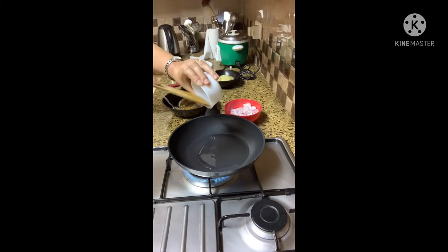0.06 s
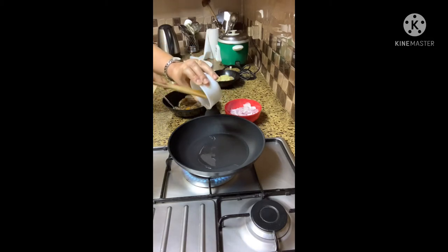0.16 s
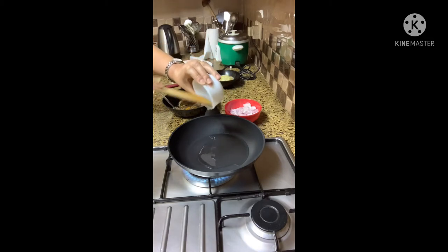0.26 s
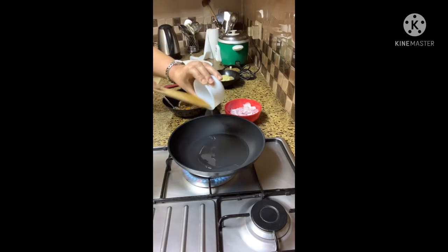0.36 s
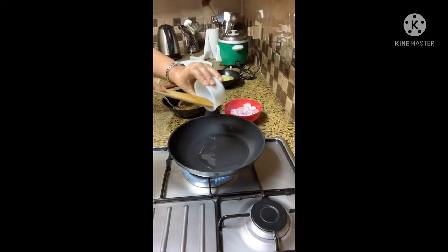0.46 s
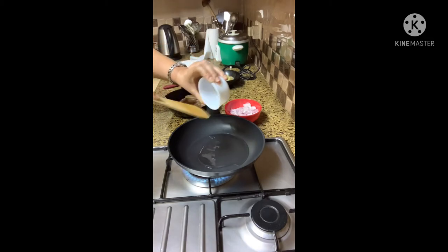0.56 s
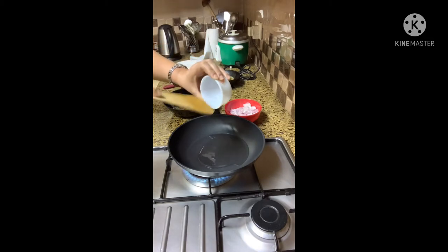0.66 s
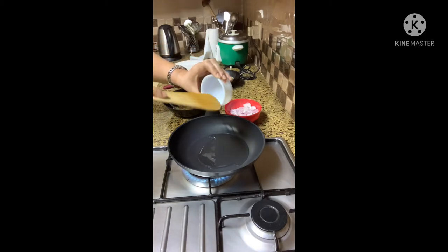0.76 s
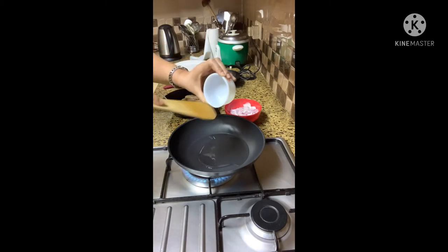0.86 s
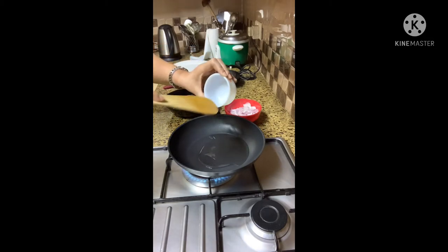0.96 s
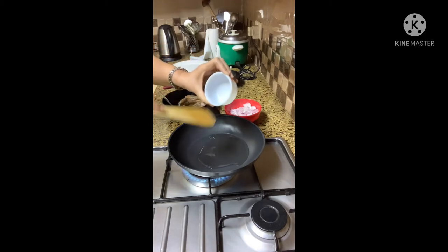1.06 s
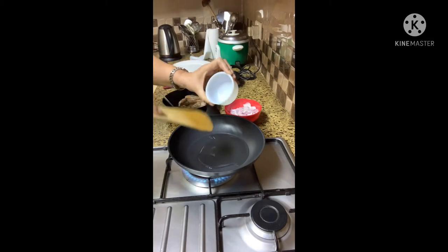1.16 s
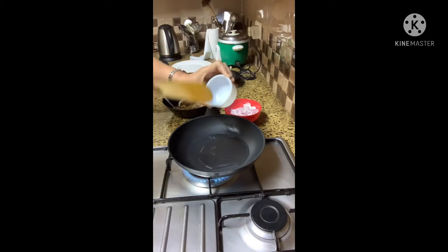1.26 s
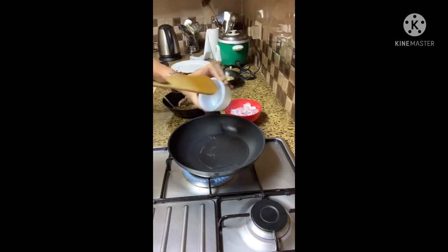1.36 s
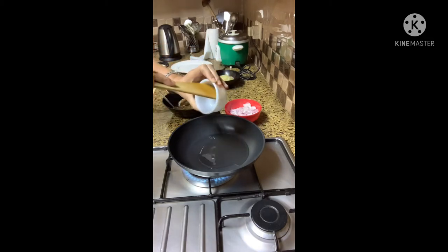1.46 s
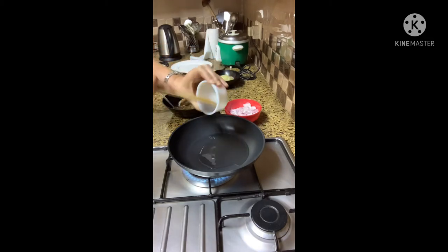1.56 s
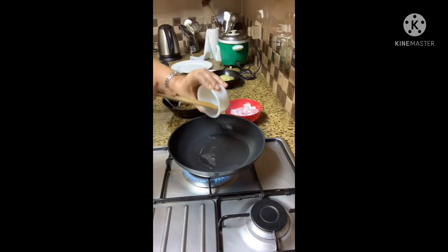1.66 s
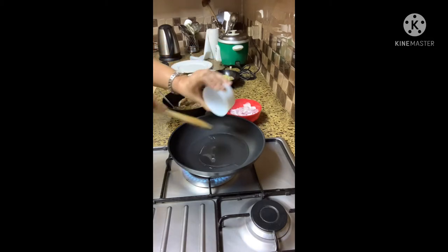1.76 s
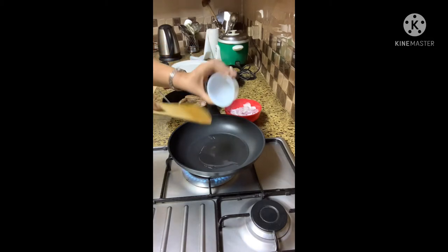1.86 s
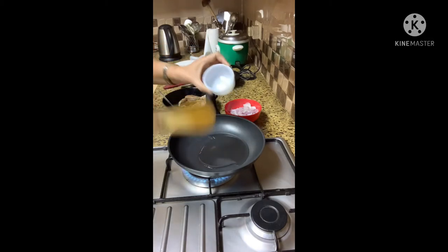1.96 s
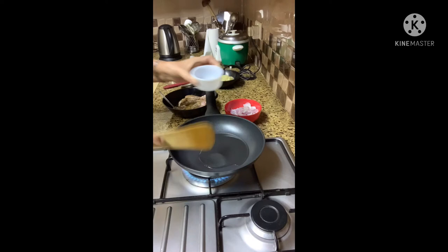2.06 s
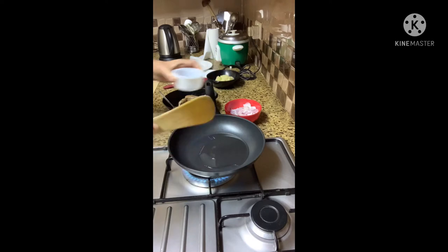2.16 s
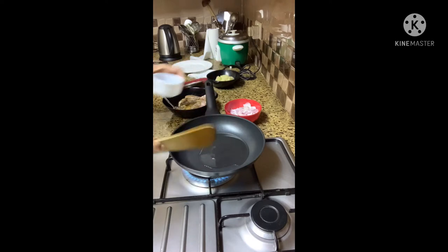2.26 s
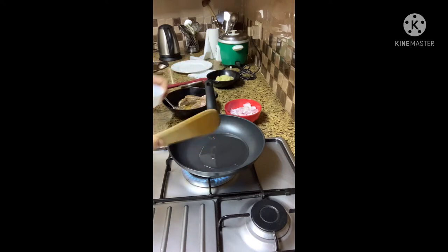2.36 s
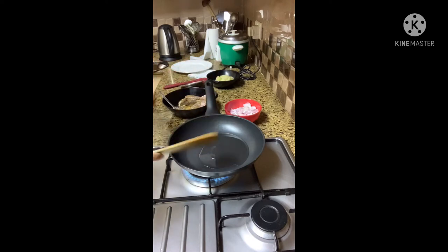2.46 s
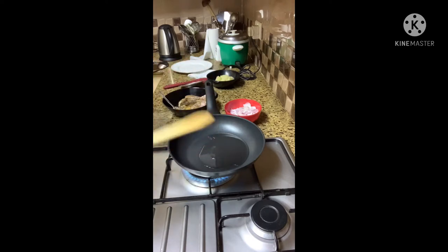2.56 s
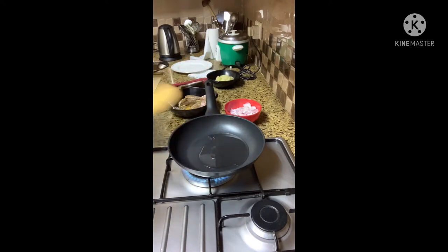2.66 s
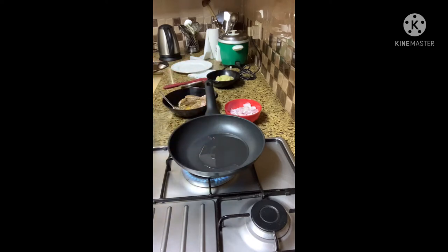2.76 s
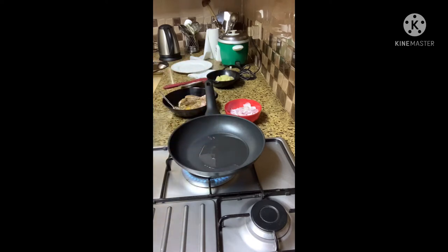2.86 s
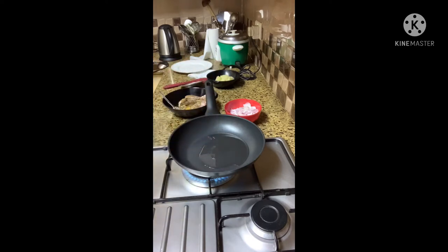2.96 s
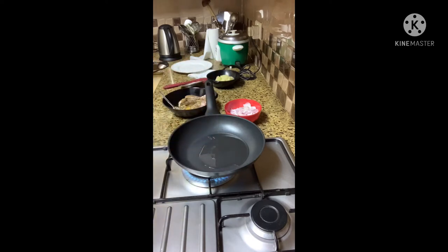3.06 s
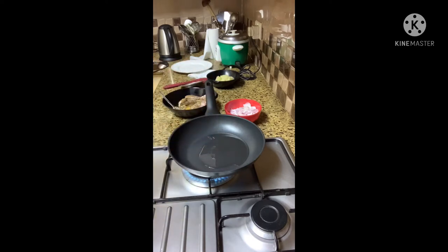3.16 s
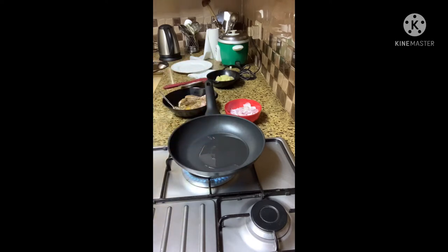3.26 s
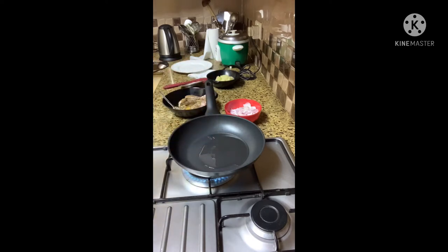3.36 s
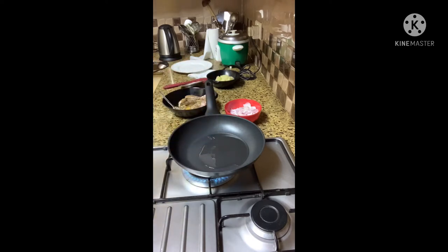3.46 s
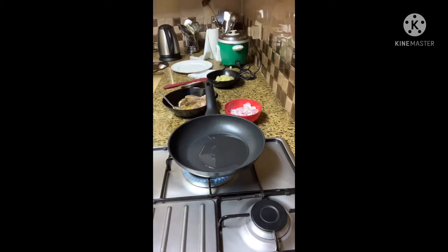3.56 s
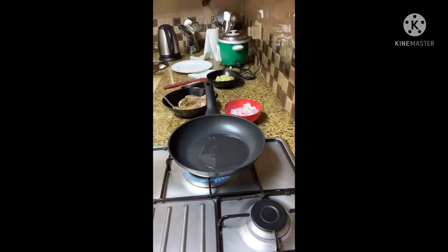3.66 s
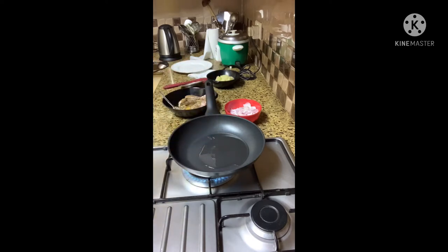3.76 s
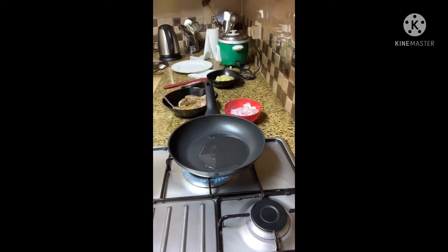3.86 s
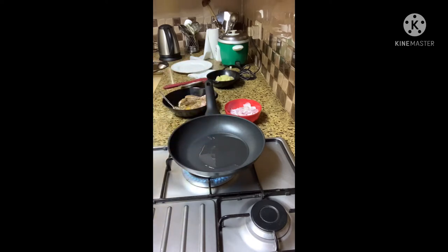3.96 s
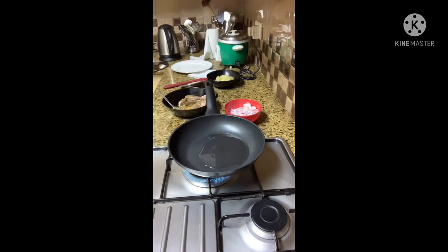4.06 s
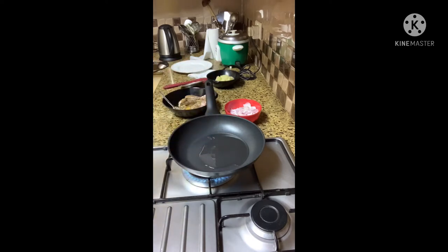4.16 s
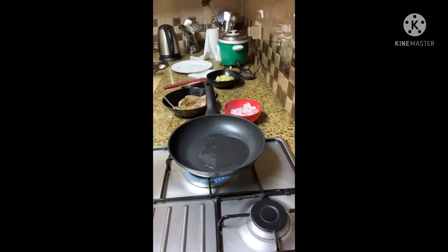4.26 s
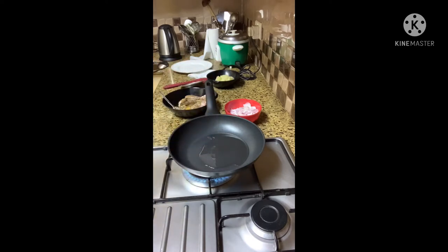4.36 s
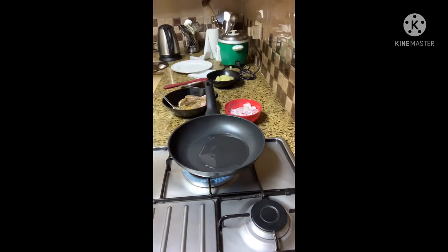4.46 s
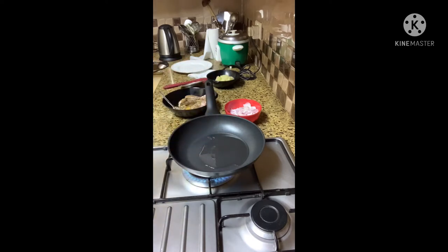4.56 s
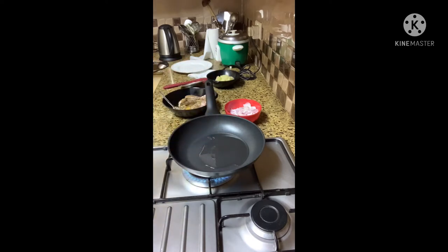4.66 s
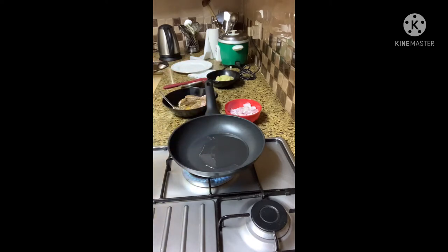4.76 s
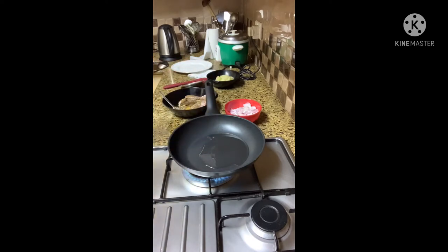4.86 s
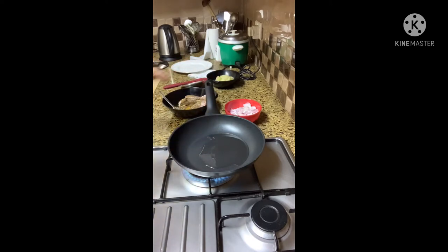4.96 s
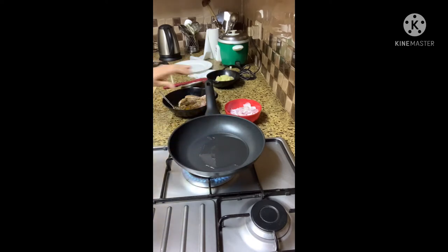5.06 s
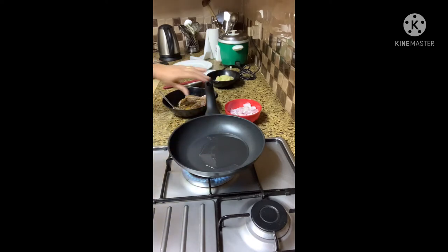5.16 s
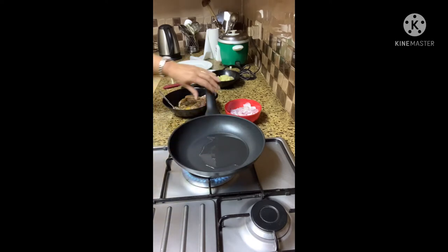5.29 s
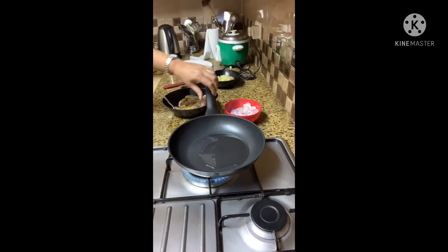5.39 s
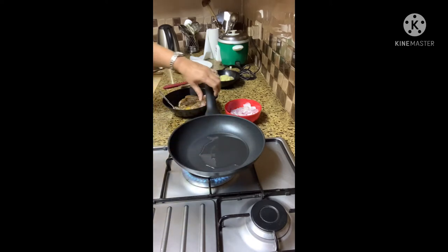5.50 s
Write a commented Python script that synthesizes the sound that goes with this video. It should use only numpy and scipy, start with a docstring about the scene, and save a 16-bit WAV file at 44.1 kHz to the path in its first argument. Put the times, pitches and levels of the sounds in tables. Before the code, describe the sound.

A gas burner hisses faintly over a low electrical hum in a small tiled kitchen. A wooden spatula wipes and taps a small hand-held bowl, making several short clinks and knocks, the loudest glancing off a frying pan. After a pause the bowl is put down on the counter with a quick clatter. Soft slides, a nudged dish and faint hand bumps follow. The microphone is close, above the hob.

```python
"""A gas burner hisses over a faint mains hum throughout. Something slides on the counter; then a wooden
spatula wipes and knocks the last oil out of a small hand-held bowl, glancing off the frying pan below.
Friction and impact excite their damped modes, and a small tiled kitchen reverberates after each knock.
Near 4 s the bowl is put down on the counter off to one side, where it rocks to rest. Last, a dish is
nudged, things are shifted softly and a hand bumps the worktop."""
import sys
import numpy as np
from scipy import signal
from scipy.fft import rfft, irfft
from scipy.io import wavfile

SR = 44100
rng = np.random.default_rng(int(sys.argv[2]) if len(sys.argv) > 2 else 0)


def file_out(sig):
    """Save sig as 16-bit WAV at sys.argv[1]."""
    # one column per channel
    cols = np.atleast_2d(sig).T
    # limit, then scale
    lim = np.clip(cols, -1, 1)
    pcm = np.round(lim * 32767).astype(np.int16)
    wavfile.write(sys.argv[1], SR, pcm)


N = 243873
T = np.arange(N) / SR
RING_T = T[:SR * 3 // 4]


def undb(db):
    """The decibel scale: 20 dB is a factor of ten in amplitude."""
    return 10 ** (np.asarray(db) / 20)


def add(out, start_s, sound):
    """Superposition: a sound sums into the mix from its start time."""
    i = max(int(start_s * SR), 0)
    out[i:i + len(sound)] += sound[:N - i]


def noise(spectrum, size=N):
    """Spectral shaping: white noise takes on a (frequency_hz, level_db) envelope, scaled to rms 1."""
    hz, db = np.transpose(spectrum)
    bins_hz = np.maximum(np.fft.rfftfreq(size, 1 / SR), 1)
    gain = undb(np.interp(np.log(bins_hz), np.log(hz), db))
    x = irfft(rfft(rng.standard_normal(size)) * gain, size)
    return x / x.std()


def waver(rate_hz):
    """Random modulation: low-passed noise drifts with a spread near 1."""
    return np.clip(noise([(rate_hz, 0), (2 * rate_hz, -40), (20 * rate_hz, -200)]), -2, 2)


def ring(modes, bright_hz=SR):
    """Free vibration: a sum of damped modes, the high ones weaker after a softer contact."""
    return sum(undb(db) / np.hypot(1, (hz / bright_hz) ** 2) * np.sin(2 * np.pi * hz * RING_T)
               * np.exp(-np.log(1000) * RING_T / t60) for hz, db, t60 in modes)


def contact(rise_s):
    """Finite rise time: the push of a blow builds up smoothly."""
    return 1 - np.exp(-(RING_T / rise_s) ** 2)


def crack(spectrum, fade_s):
    """Modal overlap: dense, quickly dying modes merge into a burst of noise."""
    return noise(spectrum, size=len(RING_T)) * np.exp(-RING_T / fade_s)


def friction(strokes, spectrum, grain_db):
    """Friction noise: each stroke swells and fades, catching unevenly on the surface."""
    force = sum(undb(db) * np.exp(np.where(T < peak, -((T - peak) / rise) ** 2, (peak - T) / fade))
                for peak, rise, fade, db in strokes)
    catch = np.interp(T, T[::100], rng.standard_normal(len(T[::100])))
    return force * undb(grain_db * catch) * noise(spectrum)


# Murmur and hiss of the flame: frequency_hz, relative_db
FLAME_SPECTRUM = [(25, -42), (34, -30), (48, -4), (85, 0), (125, 0), (190, -5), (300, -12), (390, -11),
                  (480, -13), (900, -13), (1300, -21), (4200, -22.5), (6500, -28), (16000, -29.5)]
# Narrow resonances of the burner: pitch_hz, width_hz, level_db
BURNER_RESONANCES = [(137, 10, -62), (598, 22, -72), (672, 14, -71), (755, 32, -62.5), (9600, 180, -73.5),
                     (11600, 280, -74.5), (13250, 320, -76.5), (14200, 200, -76.5)]
def burner():
    """Resonance: narrow bands stand out of the flame's broadband noise; the level flickers slightly."""
    flame = undb(-56) * noise(FLAME_SPECTRUM)
    for hz, width_hz, db in BURNER_RESONANCES:
        band = signal.lfilter(*signal.iirpeak(hz, hz / width_hz, fs=SR), rng.standard_normal(N))
        flame += undb(db) * band / band.std()
    return undb(.5 * waver(rate_hz=22)) * flame


# Partials of the hum: pitch_hz, level_db
HUM_PARTIALS = [(50, -72), (100, -59), (199.5, -70), (400, -75)]
def mains_hum():
    """Harmonic series: tones at or near multiples of the mains frequency waver together in level."""
    hum = sum(undb(db) * np.sqrt(2) * np.sin(2 * np.pi * (hz * T + rng.random()))
              for hz, db in HUM_PARTIALS)
    return undb(1.3 * waver(rate_hz=5.5)) * hum


# Things slid on the counter: peak_s, fade_s, level_db
SLIDE_STROKES = [(.01, .035, -57), (2.03, 0.055, -52.5), (4.755, 0.086, -54.5), (4.83, 0.053, -58.5),
                 (5.291, 0.1, -58.5), (5.495, 0.055, -52)]
# Their scraping: frequency_hz, relative_db
SLIDE_SPECTRUM = [(150, -12), (400, -14), (900, -4.5), (1150, -6.5), (1380, 0), (1800, -8.5), (2600, -8),
                  (4000, -16), (7000, -16.5), (15000, -34)]
def slides():
    """Sliding friction: things are pushed off briskly and coast to a stop."""
    rise_s = .017
    strokes = [(peak_s, rise_s, fade_s, db) for peak_s, fade_s, db in SLIDE_STROKES]
    return friction(strokes, SLIDE_SPECTRUM, grain_db=2.2)


# Wood wiping the oily bowl: peak_s, rise_s, level_db
WIPE_STROKES = [(.06, .03, -61), (.60, .02, -56), (0.906, .06, -53), (1.092, .002, -48), (1.58, .01, -49.5),
                (1.765, .02, -54), (4.905, .005, -56)]
# Its rubbing: frequency_hz, relative_db
WIPE_SPECTRUM = [(200, -4.5), (400, -0.5), (1500, -18), (4500, -5.5), (7000, -2), (10000, -2), (16000, 0)]
# Short, woody knock of spatula on bowl, led by the bowl's lowest wall mode: pitch_hz, relative_db, t60_s
KNOCK_MODES = [(400, -27, .045), (600, -24, .035), (880, -16, .012), (1040, -12, .016), (1190, -7, .016),
               (1418, 0, .024), (1545, -11, .035), (1710, -14, .022), (1977, -21, .012), (3570, -17, .02),
               (4100, -16, .016), (5200, -28, .009), (6250, -25, .012)]
# Higher ringing modes of the bowl: pitch_hz, relative_db, t60_s
BOWL_MODES = [(2390, -14, .03), (2572, 0, .035), (2830, -10, .03), (3050, -16, .02), (3420, -15, .022),
              (4170, -24, .018), (4870, -31, .014), (5930, -26, .018), (6075, -23, .035), (8300, -31, .012),
              (9480, -28, .014), (10600, -27, .018)]
def wipes():
    """Forced vibration: rubbing drives the knock and bowl modes, its fine grain favouring high ones."""
    fade_s, tilt_db_per_octave = .017, 12.5
    strokes = [(peak_s, rise_s, fade_s, db) for peak_s, rise_s, db in WIPE_STROKES]
    rub = friction(strokes, WIPE_SPECTRUM, grain_db=3.5)
    body = ring([(hz, db + tilt_db_per_octave * np.log2(hz), t60)
                 for hz, db, t60 in KNOCK_MODES + BOWL_MODES])
    ringing = signal.fftconvolve(rub, body / np.linalg.norm(body))[:N]
    return rub + undb(-2.5) * ringing


# Spatula against bowl: start_s, knock_db, bowl_db, brightness_hz, grip_pitch_ratio
SPATULA_TAPS = [(.137, -47, -60, 6000, 0.99), (0.2505, -6, -33, 5860, 0.95),
                (0.4542, -25.5, -56, 3280, 0.95), (.5440, -11, -32.5, 3000, 0.97),
                (1.09, -33.5, -39, 8000, 1.04), (1.4469, -25, -48.5, 5000, 0.97),
                (1.4770, -24.5, -36, 3000, 1.01), (1.5204, -7, -20.5, 2680, 1.03),
                (1.6353, -5, -3.5, 6033, 1.01)]
# Crack of that contact: frequency_hz, relative_db
CRACK_SPECTRUM = [(150, -22), (400, -6), (900, 1), (1900, -2), (2600, -4), (3500, -3), (5000, -10),
                  (6500, -9), (9000, -20), (16000, -30)]
def taps():
    """Impact excitation: the hand-damped bowl knocks and rings; force and hardness add to the crack."""
    tones, cracks = np.zeros(N), np.zeros(N)
    for start_s, knock_db, bowl_db, bright_hz, grip in SPATULA_TAPS:
        knock = undb(knock_db) * ring([(hz * grip, db, t60) for hz, db, t60 in KNOCK_MODES], bright_hz)
        bowl = undb(bowl_db) * ring(BOWL_MODES, bright_hz)
        add(tones, start_s, contact(rise_s=.0018) * (knock + bowl))
        force = np.hypot(undb(knock_db), undb(bowl_db))
        hardness = undb(-18.5 + 6 * np.log2(bright_hz / 4390))  # 6 dB per octave of brightness
        burst = contact(rise_s=.0007) * crack(CRACK_SPECTRUM, fade_s=.0026)
        add(cracks, start_s, force * hardness * burst)
    return tones, cracks


# Spatula glancing off the pan: start_s, level_db, brightness_hz
PAN_BLOWS = [(1.092, -32.5, 850), (1.444, -30, 700), (1.6519, -19.5, 1500), (1.6591, -28, 650)]
# Modes of the pan and of the worktop: pitch_hz, relative_db, t60_s
PAN_MODES = [(295, -15, 0.046), (388, -4.5, 0.03), (600, -4.5, 0.022), (847, -2, 0.0057), (1090, 1, 0.034)]
WORKTOP_MODES = [(92, -12, 0.09), (132, -3, .12), (190.5, -5, 0.17), (340, -26.5, 0.037)]
def pan_knocks():
    """Structure-borne sound: a blow rings the pan and reaches the worktop through the hob."""
    out = np.zeros(N)
    thump = undb(-24.5) * ring(WORKTOP_MODES)
    for start_s, db, bright_hz in PAN_BLOWS:
        add(out, start_s, undb(db) * contact(rise_s=.0032) * (ring(PAN_MODES, bright_hz) + thump))
    return out


def rocking(count, gap_ratio=.74, loss_db=5):
    """Dissipation: each knock of a rocking dish comes sooner and weaker. Gives (delay_s, gain) pairs."""
    turns = np.arange(count)
    gaps_s = .0185 * gap_ratio ** turns
    return zip(np.cumsum(gaps_s) - gaps_s[0], undb(-loss_db * turns))


# The bowl's edge lands, then its foot; later a dish is nudged: start_s, counter_db, bowl_db, brightness_hz
LANDINGS = [(3.9109, -62, -34, 3600), (3.9189, -17, -19, 5460), (4.737, -43.5, -61, 1500)]
# Modes of the counter and the crockery on it: pitch_hz, relative_db, t60_s
COUNTER_MODES = [(400, -22, .06), (480, -17, .07), (662, -14, .07), (935, -12, .05), (1055, -16, .04),
                 (1310, -11, .03), (1450, -4, .04), (1535, -7, .035), (1720, -5, .03), (1990, -11, .025),
                 (3320, -13, .018), (3880, -13, .016)]
# Clatter of that crockery: frequency_hz, relative_db
CLATTER_SPECTRUM = [(100, -12), (450, -9), (1100, -2), (1600, 5), (2100, -3), (3700, -5), (5000, -14),
                    (6300, -19), (7400, -35), (8800, -29), (16000, -40)]
# Ping of the bowl's hard foot on the stone: pitch_hz, relative_db, t60_s
FOOT_MODES = [(11400, -40, 0.11), (11640, -55, .06)]
def set_downs():
    """Repeated impact: a dish rocks to rest, and the worktop thumps as it takes up the weight."""
    knocks, thumps = np.zeros(N), np.zeros(N)
    for start_s, counter_db, bowl_db, bright_hz in LANDINGS:
        bowl = undb(bowl_db) * ring(BOWL_MODES, bright_hz)
        for delay_s, gain in rocking(count=5):
            clatter = undb(-7.5) * crack(CLATTER_SPECTRUM, fade_s=.013)
            counter = undb(counter_db) * (undb(-2) * ring(COUNTER_MODES, bright_hz) + clatter)
            add(knocks, start_s + delay_s, gain * contact(rise_s=.0016) * (counter + bowl))
        add(thumps, start_s, undb(counter_db - 6.5) * contact(rise_s=.019) * ring(WORKTOP_MODES))
    foot_s = LANDINGS[1][0]
    add(knocks, foot_s, ring(FOOT_MODES))
    # further off, so the room has a larger share of the sound
    return undb(3) * knocks + thumps + undb(-6) * reverb(knocks + thumps, build_s=.0047)


# A hand on the worktop: start_s, level_db
HAND_BUMPS = [(5.353, -38.5), (5.407, -43), (5.461, -43.5)]
def bumps():
    """Plate vibration: soft blows set the worktop's low modes ringing."""
    out = np.zeros(N)
    for start_s, db in HAND_BUMPS:
        add(out, start_s, undb(db) * contact(rise_s=.002) * ring(WORKTOP_MODES))
    return out


# Reflections from hob, wall tiles and cupboard: delay_s, gain
REFLECTIONS = [(.00503, .3), (.0152, .13), (.031, .08)]
def echoes(x):
    """Early reflection: each nearby surface returns a delayed, weaker copy."""
    return sum(gain * np.interp(T - delay_s, T, x, left=0) for delay_s, gain in REFLECTIONS)


# Reverberation time of the kitchen: frequency_hz, t60_s
KITCHEN_DECAY = [(125, .4), (500, 0.33), (1400, 0.52), (2600, 0.38), (6000, 0.44), (14000, 0.033)]
def reverb(x, build_s):
    """Reverberation: a diffuse field builds up, then decays at its own rate in each octave."""
    hz, t60 = np.transpose(KITCHEN_DECAY)
    octave = np.log2(np.clip(np.fft.rfftfreq(len(RING_T), 1 / SR), 125, 16000))
    phases = np.exp(2j * np.pi * rng.random(len(octave)))
    tail = np.zeros(len(RING_T))
    for centre_hz in 125 * 2 ** np.arange(8):
        band = irfft(phases * np.maximum(1 - abs(octave - np.log2(centre_hz)), 0), len(RING_T))
        band_t60 = np.interp(np.log(centre_hz), np.log(hz), t60)
        tail += band * np.exp(-np.log(1000) * RING_T / band_t60)
    tail *= contact(build_s)
    return signal.fftconvolve(x, tail / np.linalg.norm(tail))[:N]


def scene():
    """Superposition: direct and reflected sound sum at one point above the hob."""
    tones, cracks = taps()
    tones += pan_knocks()
    direct = tones + cracks
    # directivity: the bowl's mouth beams its tones forward, while the crack spreads all round the room
    diffuse = reverb(undb(-15) * tones + undb(-5.5) * cracks, build_s=.007)
    knocks = direct + echoes(direct) + diffuse + set_downs()
    handling = wipes() + slides() + bumps()
    handling += undb(-12.5) * reverb(handling, build_s=.01)
    return (burner() + mains_hum() + knocks + handling)[None]


def record(dry):
    """Band limiting: filters cut the deepest bass and the highest treble."""
    bottom_hz, top_hz = 42, 15850
    lean = signal.sosfilt(signal.butter(6, bottom_hz, "high", fs=SR, output="sos"), dry)
    return signal.sosfilt(signal.ellip(10, .2, 70, top_hz, fs=SR, output="sos"), lean)


dry = scene()
out = record(dry)
file_out(out)
```